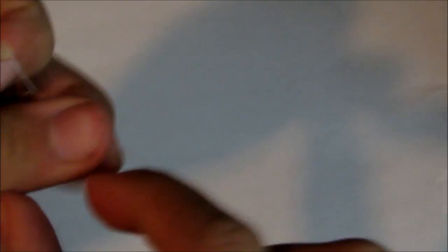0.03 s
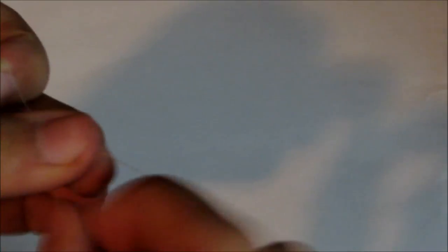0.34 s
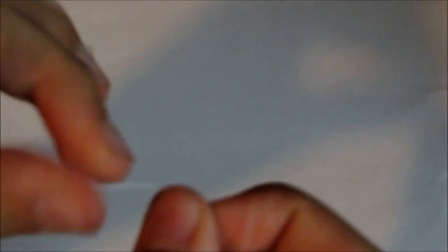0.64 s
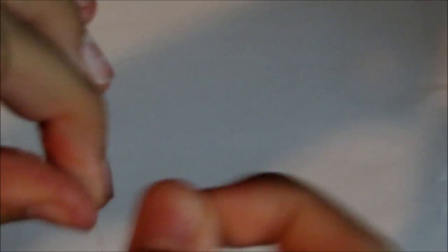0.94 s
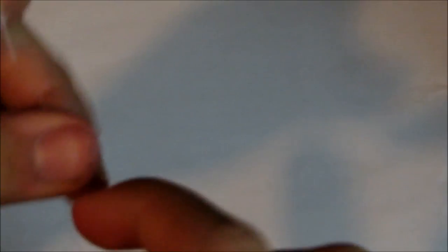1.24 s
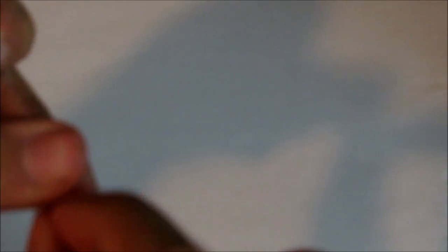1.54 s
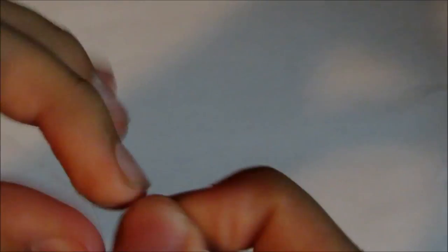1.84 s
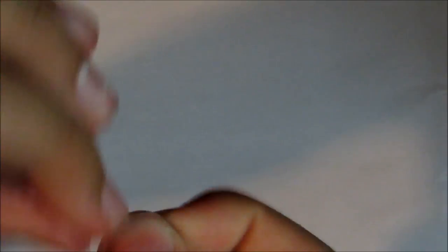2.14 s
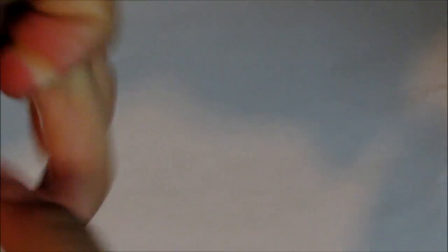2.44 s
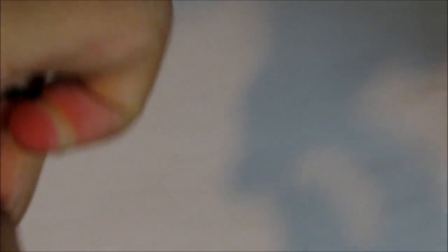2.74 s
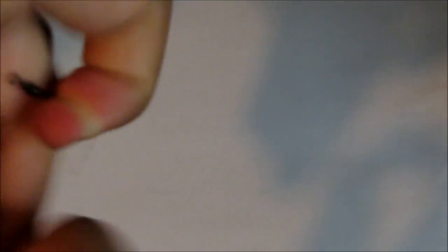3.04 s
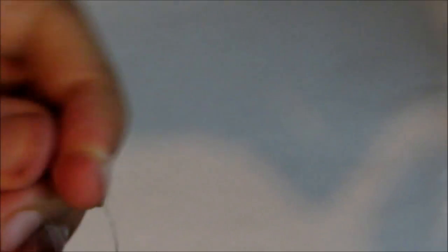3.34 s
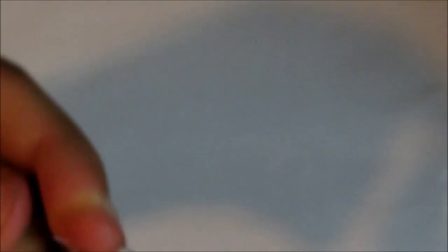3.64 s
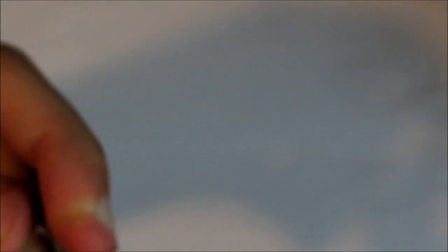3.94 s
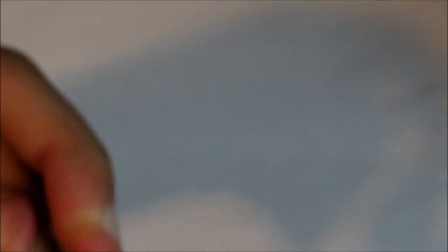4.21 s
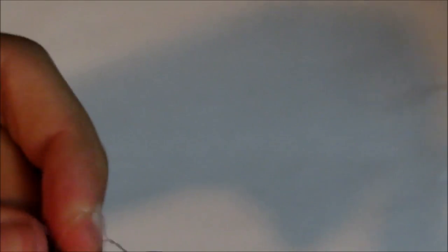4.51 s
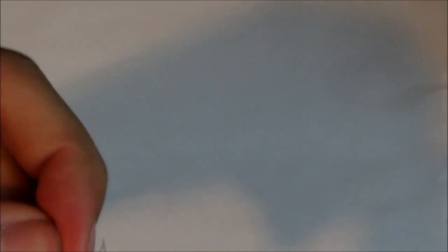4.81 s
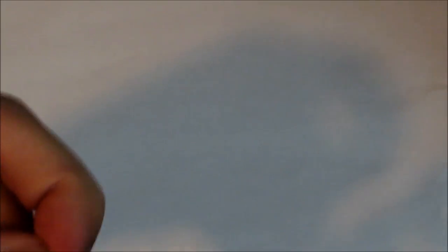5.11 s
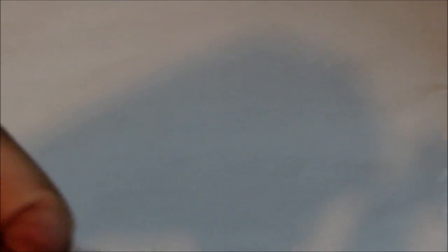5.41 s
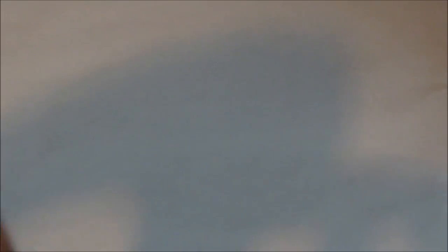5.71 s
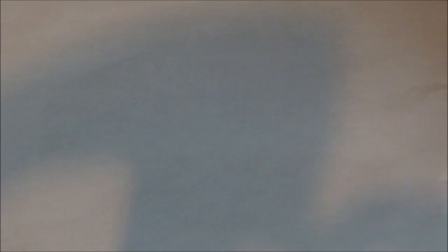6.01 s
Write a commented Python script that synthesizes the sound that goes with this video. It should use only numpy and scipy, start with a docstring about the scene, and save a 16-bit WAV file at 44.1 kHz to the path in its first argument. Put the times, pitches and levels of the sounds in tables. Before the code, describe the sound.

Close, tiny clicks and snaps as fingers knot line onto a swivel in a softly humming room, then a hand bumps the table.

```python
"""Knotting line onto a swivel

A fan hums and a camera whines faintly in a small, bare room. Close by, fingers knot fishing line onto
a metal swivel. The line slips and the swivel snaps against the fingernails: sharp ticks that ring
briefly and fill the room. At the end a hand bumps the table and drags over it."""
import sys
import numpy as np
from scipy import signal
from scipy.fft import rfft, irfft, next_fast_len
from scipy.io import wavfile
from scipy.ndimage import uniform_filter1d

SR = 44100
rng = np.random.default_rng(int(sys.argv[2]) if len(sys.argv) > 2 else 0)


def master(y):
    """Save y as 16-bit WAV."""
    cut = np.clip(np.atleast_2d(y).T, -1, 1)
    pcm = np.round(cut * 32767)  # scale
    wavfile.write(sys.argv[1], SR, pcm.astype(np.int16))


N = 267246
AGE_S = np.arange(int(0.5 * SR)) / SR   # time since a tick or knock began


def from_db(db):
    """Turn decibels into a volume factor."""
    return 10 ** (np.asarray(db) / 20)


def rms_one(x):
    """Scale a signal so its average strength (rms) is 1."""
    return x / np.sqrt(np.mean(x ** 2) + 1e-20)


def coloured(x, points):
    """Make some pitches louder and others softer, following (pitch_hz, level_db) points."""
    size = next_fast_len(x.shape[-1], True) * 2
    hz, db = np.transpose(points)
    bins_hz = np.maximum(np.arange(size // 2 + 1) * SR / size, 1)
    gain = from_db(np.interp(np.log(bins_hz), np.log(hz), db))
    cepstrum = irfft(np.log(gain))
    cepstrum[1:size // 2] *= 2   # folded forward, so nothing rings before it is struck
    cepstrum[size // 2 + 1:] = 0
    return irfft(rfft(x, size) * np.exp(rfft(cepstrum)))[..., :x.shape[-1]]


def stereo(mid, side):
    """Make left and right from what they share (mid) and how they differ (side)."""
    return np.array([mid + side, mid - side])


def add(out, start_s, sound):
    """Mix a sound in at its start time."""
    start = int(start_s * SR)
    part = sound[:, :N - start]
    out[:, start:start + part.shape[1]] += part


def dying(fade_s, age_s=AGE_S):
    """A fade that falls 60 dB in fade_s seconds."""
    return np.exp(-np.log(1000) * age_s / fade_s)


def ringing(tones):
    """A struck object rings with fading tones, each at a random phase in mid and side."""
    phases = rng.uniform(0, 2 * np.pi, (len(tones), 2, 1))
    return sum(from_db(db) * dying(fade_s) * np.sin(2 * np.pi * hz * AGE_S + phase)
               for (hz, db, fade_s), phase in zip(tones, phases))


# Tone colour of the air, for mid and for side: pitch_hz, level_db
AIR_MID_COLOUR = [(15, -54), (25, -16), (59, -11.5), (154, -17.5), (301, -15), (344, -9), (438, -9.5),
                  (515, -3.5), (558, -8.5), (1030, -12.5), (1280, -14), (3930, -20), (10900, -25.5),
                  (11800, -28.5), (15000, -39.5)]
AIR_SIDE_COLOUR = [(15, -52), (25, -22.5), (196, -7.5), (271, -7.5), (344, -6), (438, -9.5), (515, -4),
                   (811, -12), (1030, -13), (3350, -22.5), (3930, -25.5), (4870, -26), (7480, -27),
                   (13800, -38), (15000, -49)]
def air(mid_db=-53.5, side_db=-48.5):
    """The room rushes and the microphone hisses steadily."""
    mid, side = rng.standard_normal((2, N))
    return stereo(from_db(mid_db) * rms_one(coloured(mid, AIR_MID_COLOUR)),
                  from_db(side_db) * rms_one(coloured(side, AIR_SIDE_COLOUR)))


# Fan hum and, last, the camera's faint sizzle: pitch_hz, width_hz, level_db, side_over_mid_db
HUM_BANDS = [(60.3, 17, -85, -11), (199, 89, -72.5, -1), (344.3, 50, -70, 14), (395.4, 14, -74.5, 12),
             (502.3, 11.7, -65.5, 5), (522.5, 6.6, -67.5, -0.5), (627.6, 83, -65, 8), (737, 57, -64.5, 3),
             (1021, 64, -65.5, 2.5), (11900, 500, -87, -6)]
def hum():
    """The fan hums and the camera sizzles: narrow bands of noise that sound like wavering tones."""
    out = np.zeros((2, N))
    for hz, width_hz, db, side_db in HUM_BANDS:
        band = signal.iirpeak(hz, hz / width_hz, fs=SR)
        noise = rng.standard_normal((2, N))
        mid, side = rms_one(signal.lfilter(*band, signal.lfilter(*band, noise)))
        out += from_db(db) * stereo(mid, from_db(side_db) * side)
    return out


def camera_whine(pitch_hz=11650, level_db=-70.5, waver_hz=8):
    """The camera's electronics give one thin tone that barely wavers."""
    waver = rms_one(uniform_filter1d(rng.standard_normal(N), size=2000))
    phase = 2 * np.pi * np.cumsum(pitch_hz + waver_hz * waver) / SR
    return from_db(level_db) * np.sqrt(2) * np.sin([phase, phase + .9])


def slipping(slip_s, fade_s, first_grip=0.12):
    """A slipping line keeps feeding the sound, so it swells until the line lets go."""
    slipped_s = np.minimum(AGE_S, max(slip_s, 1 / SR))
    swell = first_grip + (1 - first_grip) * slipped_s / slipped_s[-1]
    hold_off_fade = np.exp(np.log(1000) * (slipped_s - slipped_s[-1] / 2) / fade_s)
    return swell * hold_off_fade


def crack(fade_s, contact_db=29.5, room_db=-24, room_fade_s=0.44):
    """A sharp contact, then quick echoes from the table and near walls, then the room dying away."""
    echoes = rms_one(rng.standard_normal((2, len(AGE_S))))
    sound = echoes * np.hypot(dying(fade_s), from_db(room_db) * dying(room_fade_s))
    sound[0, 0] += from_db(contact_db)   # the contact is in the mid only
    return sound


def pinched_line(pitch_hz, fade_s, sharpness=16):
    """The line beside the pinch rings around one pitch, muffled by the fingers."""
    return signal.lfilter(*signal.iirpeak(pitch_hz, sharpness, fs=SR), crack(fade_s))


# Hollow tones of the tackle in cupped fingers, and the metal swivel's tones: pitch_hz, level_db, fade_s
HOLLOW_TONES = [(352.6, -16.5, 0.16), (443, -12.5, 0.14), (832, -8.5, 0.16), (900, -5.5, 0.094),
                (1410, -34, 0.14), (2019, -12, 0.12), (2170, -8, 0.05), (2470, -11.5, 0.087),
                (2630, -13, 0.15), (3012, -17, 0.2), (3384, -13, 0.13), (3500, -10.5, 0.09)]
SWIVEL_TONES = [(1434, 3, 0.2), (4910, -20, 0.28), (5780, -10, 0.28), (5790, -7, 0.14), (5985, -17, 0.21),
                (6300, -15.5, 0.35), (6240, -22, 0.24), (6300, -19, 0.25), (6960, -6, 0.16),
                (7460, -18, .22), (7350, -4.5, 0.15), (7800, -10, 0.3), (8360, -10, 0.2), (8420, -8, 0.14),
                (9750, -7, 0.13), (9900, -3, 0.062), (11100, -9, 0.097), (11700, -19, 0.11),
                (12220, -11, 0.14)]
def tackle_ring(tick_db, swivel_db, hard_snap_db=-11.5, hard_ring_db=2, loss_per_db=0.03):
    """A snap shakes the tackle and swivel; softer ticks have a little less of the hollow ring."""
    hollow_db = hard_ring_db - loss_per_db * (hard_snap_db - tick_db)
    return from_db(hollow_db) * ringing(HOLLOW_TONES) + from_db(swivel_db) * ringing(SWIVEL_TONES)


# How wide nearby sounds seem: pitch_hz, side_over_mid_db
STEREO_WIDTH = [(100, 11), (400, 6), (900, 4), (2000, -7.5), (5000, -4.5), (9000, -1.5), (13000, 1.5)]
def widen(mid, side):
    """The camera's close-set microphones exaggerate the left-right difference in the bass."""
    return stereo(mid, coloured(side, STEREO_WIDTH)) / np.sqrt(2)


# Tone colour of all ticks; such small parts give off little bass: pitch_hz, level_db
SMALL_PARTS_COLOUR = [(70, -20), (170, -17), (480, -7), (1100, -10.5), (2500, -2.5), (3400, 0.5),
                      (4050, -1.5), (4700, 1.5), (7200, 1.5), (8200, -2), (9500, 0), (11500, -2),
                      (14000, -10), (15000, -15)]
# One row per tick; "lower" and "upper" are the line's two pitches, one on each side of the pinch:
# start_s, level_db, slip_s, bright_db, swivel_db, lower_hz, lower_db, upper_hz, upper_db
LINE_TICKS = [ (.2565, -38.5, .001, 2, -10, 2130, 15, 5480, 8.5),
              (.378, -57, .008, 4, -14, 13800, 12, 14300, 22),
              (.414, -43.5, 0.0062, 2, -14, 6940, -2, 12800, 12),
              (.611, -35.5, 0.0014, 0.5, -20, 10600, 2, 13700, 12.5),
              (1.4631, -32, 0.0005, -2, -25, 5300, 6, 13700, 10),
              (1.4658, -30.5, 0.01, -9.5, -19, 10430, 17.5, 11600, 18),
              (1.5273, -39.5, .003, 16, -11, 7650, 6, 12400, 2),
              (1.6743, -50, .003, -11, -6, 5500, -4, 7700, 3),
              (1.7791, -38.5, 0.0014, 4, -14, 3520, 14.5, 6740, 4),
              (1.8037, -34, 0.0046, 9, -3, 6800, 8, 11000, 5),
              (1.8097, -17, 0.00063, 9, -6, 3560, 1, 7540, 3),
              (1.914, -37, .0007, 0.5, -10, 2300, 8, 7500, 4.5),
              (2.8487, -25.5, 0.00079, -7.5, -4, 3000, -3, 6400, 7),
              (2.945, -51, .005, 6, -11, 6800, 0, 14200, 17),
              (3.844, -52, .008, -1, -12, 11500, 17, 12700, 22),
              (3.951, -47.5, 0.0067, -6, -16, 11300, 14, 12200, 17),
              (3.994, -48, .010, -8, -10, 2330, 14, 6000, -3),
              (5.1176, -42, 0.0017, -1, -12, 6370, 14, 7500, 19.5),
              (5.1185, -43.5, 0.0066, 5.5, -17, 11100, 20, 11700, 24), ]
def ticks(free_fade_s=0.23, halving_slip_s=0.018, tilt_from_hz=2420, tilt_to_hz=11900):
    """The line slips, the swivel snaps against a fingernail, and tackle and line ring briefly."""
    out = np.zeros((2, N))
    colour_hz, colour_db = np.transpose(SMALL_PARTS_COLOUR)
    tilt = np.interp(np.log(colour_hz), np.log([tilt_from_hz, tilt_to_hz]), [-.5, .5])
    for start_s, db, slip_s, bright_db, swivel_db, lower_hz, lower_db, upper_hz, upper_db in LINE_TICKS:
        # A long slip fades sooner: the finger is still on the line.
        fade_s = free_fade_s / (1 + slip_s / halving_slip_s)
        tackle = tackle_ring(db, swivel_db)
        line = from_db(lower_db) * pinched_line(lower_hz, fade_s)
        line += from_db(upper_db) * pinched_line(upper_hz, fade_s)
        tick = (crack(fade_s) + tackle + line) * slipping(slip_s, fade_s)
        colour = list(zip(colour_hz, colour_db + bright_db * tilt))
        add(out, start_s, from_db(db) * coloured(tick, colour))
    return widen(*out)


# Tones of the table top: pitch_hz, level_db, fade_s
TABLE_TONES = [(478, -10, 0.096), (645, -20, 0.33), (883, -18.5, 0.11), (1080, -12.5, 0.074),
               (1870, -17, .1), (1900, -27, 0.14), (2220, -13.5, .1)]
# Tone colour of the knock and of the rub: pitch_hz, level_db
THUD_COLOUR = [(60, -37), (200, -14), (450, -8.5), (1000, -7.5), (1500, -8.5), (2400, -10.5), (3500, -17.5),
               (5000, -28), (14000, -48)]
RUB_COLOUR = [(60, -57), (180, -7.5), (350, -10), (490, 5), (680, -3), (800, -5), (950, -10), (1400, -19),
              (3000, -28), (8000, -53)]
# Each time the hand lands: start_s, knock_db, rise_s, fade_s, drag_s, drag_db
HAND_LANDINGS = [(5.716, -11, 0.0024, 0.092, 0.12, -43.5), (5.9126, -24.5, 0.00055, .035, 0.02, -53)]
def hand_on_table(rub_rise_s=0.033, rub_fade_s=0.094):
    """The hand lands with a dull knock, then drags with a low rub that builds and dies away."""
    out = np.zeros((2, N))
    for start_s, knock_db, rise_s, fade_s, drag_s, drag_db in HAND_LANDINGS:
        thud = rng.standard_normal((2, len(AGE_S))) * dying(fade_s) + ringing(TABLE_TONES)
        knock = coloured(thud * np.minimum(AGE_S / rise_s, 1), THUD_COLOUR)
        since_drag_s = np.maximum(AGE_S - drag_s, 0)
        pressure = np.minimum(AGE_S / rub_rise_s, 1) * dying(rub_fade_s, since_drag_s)
        rub = rms_one(coloured(rng.standard_normal((2, len(AGE_S))), RUB_COLOUR))
        add(out, start_s, from_db(knock_db) * knock + from_db(drag_db) * pressure * rub)
    return widen(*out)


def scene(lean_right_db=0.27):
    """The hands at work, over the room's steady background."""
    handling = ticks() + hand_on_table()
    background = (air() + hum()) * from_db([[-lean_right_db], [lean_right_db]])
    return handling + background + camera_whine()


def record(dry, notch_width_hz=220, cutoff_hz=14900):
    """The camera cuts out two narrow bands of pitch and the highest treble."""
    for notch_hz in (3950, 7900):
        dry = signal.lfilter(*signal.iirnotch(notch_hz, notch_hz / notch_width_hz, fs=SR), dry)
    return signal.sosfilt(signal.ellip(10, .2, 80, cutoff_hz, fs=SR, output="sos"), dry)


dry = scene()
out = record(dry)
master(out)
```